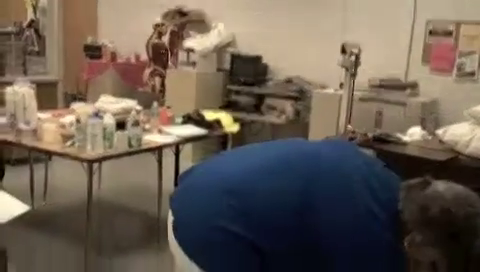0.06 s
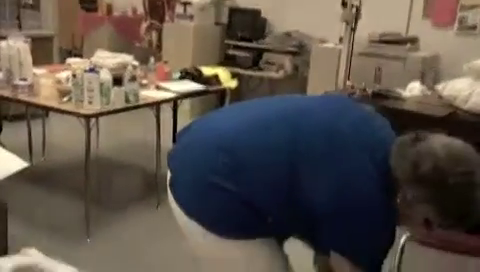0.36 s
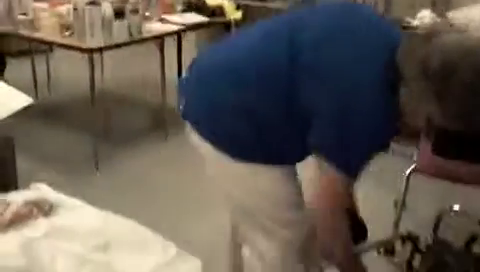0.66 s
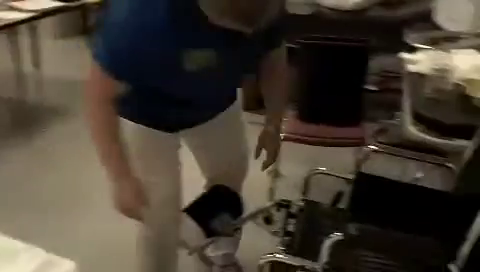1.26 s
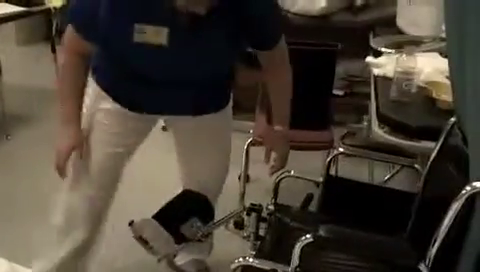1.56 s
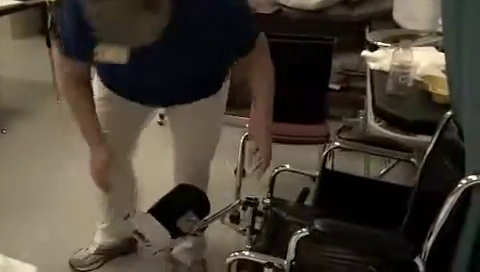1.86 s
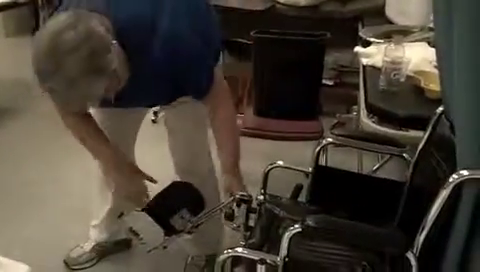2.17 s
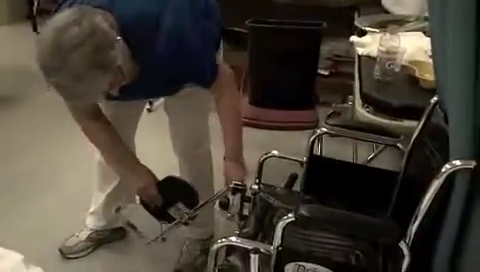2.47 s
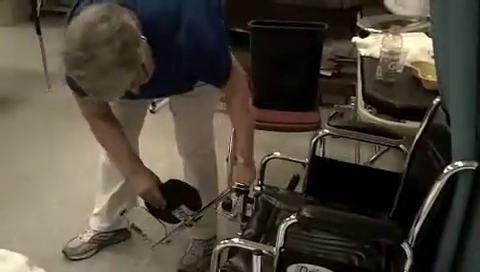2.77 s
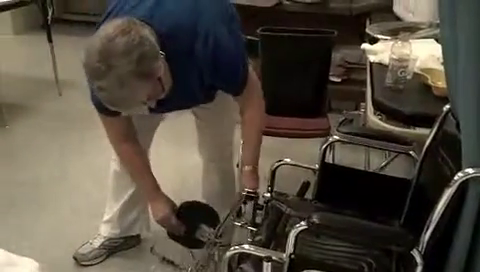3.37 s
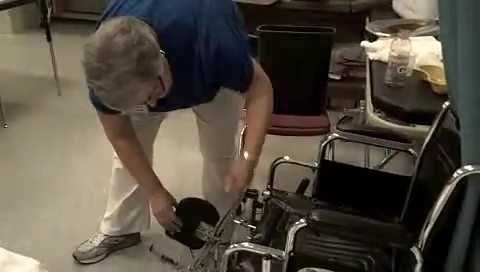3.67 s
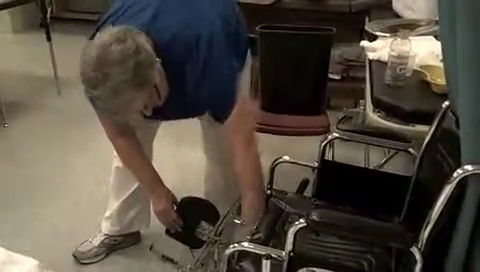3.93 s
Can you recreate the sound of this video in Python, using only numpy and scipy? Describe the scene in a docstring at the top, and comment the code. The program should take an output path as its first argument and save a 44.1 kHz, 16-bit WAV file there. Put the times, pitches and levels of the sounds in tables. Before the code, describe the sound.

Metal wheelchair parts click and clack as they are handled in a quiet room.

```python
"""Fitting a wheelchair leg rest

A metal leg rest is fitted by hand in a quiet room. Latch and tubes tick, scrape and clack:
each contact is a flurry of tiny impacts that rings the frame briefly. One joint slips with a thin squeak.
The helper's clothes rustle, shoes are set down, hands and plastic parts tap.
Ventilation rumble, mains hum and a faint buzz lie underneath."""
import sys
import numpy as np
from scipy import signal
from scipy.fft import rfft, irfft
from scipy.io import wavfile

SR = 44100
rng = np.random.default_rng(int(sys.argv[2]) if len(sys.argv) > 2 else 0)


def master_out(mix):
    """Clip the mix to full scale and print it as 16-bit PCM to the path in sys.argv[1]."""
    frames = np.transpose(np.atleast_2d(mix))
    ceiling = np.clip(frames, -1, 1)
    pcm = np.round(ceiling * 32767).astype(np.int16)
    wavfile.write(sys.argv[1], SR, pcm)


N = 176400
T = np.arange(N) / SR

# metal contacts (time [s], latch click [dB], knock [dB], snap [dB], tube ring [dB], chatter decay [s])
METAL_CONTACTS = [(.2168, -21, -40, -64, -38, 0.0047), (.243, -15.5, -24.5, -54, -33, .004),
                  (.3385, -20, -28, -58, -37, .003), (1.003, -18.5, -36, -55, -47, 0.006),
                  (1.949, -31, -39, -60, -47, .002), (2.4685, -21, -30, -55, -32, .003),
                  (2.5367, -11, -14.5, -38, -14, 0.00092), (2.539, -2, -9.5, -24.5, -9.5, 0.0025),
                  (2.575, -28, -18, -40, -17, 0.0062), (2.679, -24, -27, -55, -17, 0.017),
                  (2.7087, -11, -18.5, -32, -18, 0.0099), (2.7785, -26, -35, -52, -43, .002),
                  (2.8093, -29, -28.5, -47, -38, 0.0008), (2.8255, -9.5, -19.5, -32, -27, 0.0028),
                  (2.897, -21.5, -39, -55, -45, .003), (2.9362, -15, -18, -28, -31, 0.0023),
                  (2.939, 4.5, -9, -13.5, -24, 0.0039), (2.9505, -10, -10.5, -24, -14, 0.0014),
                  (3.089, -21, -42, -50, -42, 0.012), (3.138, -29, -19.5, -37, -30, 0.013),
                  (3.2036, -24, -21, -42, -31, 0.013), (3.2625, -27, -25, -55, -42, .009),
                  (3.356, -19, -20, -55, -40, .016), (3.377, -19, -16, -53, -35, 0.024),
                  (3.391, -20, -28, -24, -36, 0.0017), (3.393, -2.5, -20, -18.5, -10, 0.0025),
                  (3.4002, -5, -12.5, -28, -15, 0.016), (3.416, -15.5, -15, -41, -20, 0.0036),
                  (3.4295, 1, -6.5, -11.5, -9.5, 0.009), (3.5404, -19.5, -20, -33, -33, 0.0044),
                  (3.7344, -41, -31.5, -55, -29, 0.0026), (3.7668, -36, -27, -55, -32, 0.0038)]
# latch click, dull knock and treble snap spectra (frequency [Hz], relative level [dB])
CLICK_SPECTRUM = [(100, -62), (1500, -15), (2400, -8), (3200, -7.5), (3700, 1), (4300, 5.5), (5000, 6.5),
                  (5800, -2.5), (6600, -18), (7600, -31), (9200, -33), (15500, -35)]
KNOCK_SPECTRUM = [(60, -10), (160, 3), (330, 6), (600, 6.5), (900, 10), (1100, 1.5), (1350, 7), (1600, 0),
                  (1950, 5.5), (2600, -6.5), (4000, 9), (12000, -66)]
SNAP_SPECTRUM = [(2000, -17), (5400, 9), (6300, 14), (7700, -15), (9200, -1.5), (11500, 2), (13000, -4),
                 (15500, -15)]
# latch and frame tube modes (frequency [Hz], relative level [dB], T60 [s])
LATCH_MODES = [(2944, -4.5, 0.18), (3405, -11, .13), (3440, -1.5, 0.12), (3900, 0, 0.11), (4107, 2, 0.14),
               (4070, -3, 0.077), (4387, -7, 0.11), (4600, -12, .09), (4990, -4, 0.12), (5940, -23, .13),
               (6500, -12, 0.11)]
TUBE_MODES = [(540.5, -2.5, 0.086), (698, -7.5, 0.2), (888, -4.5, 0.13), (1238, -7.5, 0.12),
              (1325, -2.5, .12), (1367, 1.5, 0.11), (1889, -7.5, 0.14), (2250, -11.5, 0.11),
              (2370, -10, 0.18)]
# joint squeak (time [s], pitch [Hz], level [dB])
SQUEAK_TRACK = [(2.607, 11150, -70), (2.611, 10950, -46), (2.617, 10800, -49), (2.622, 10620, -42),
                (2.631, 10400, -44.5), (2.636, 10680, -46), (2.643, 10650, -43), (2.651, 10800, -55),
                (2.662, 10550, -69)]
# shoe contacts (time [s], thud [dB], heel click [dB], scuff decay [s])
FOOTFALLS = [(1.4357, -17, -10.5, 0.00054), (1.9969, -15.5, -15, 0.0016), (2.010, -18.5, -24, 0.0092)]
# sole thud and heel click spectra (frequency [Hz], relative level [dB])
SOLE_SPECTRUM = [(60, -14), (150, 0), (260, 3), (340, 2.5), (420, -3), (520, 2.5), (780, -1.5),
                 (1000, -18.5), (3000, -8.5), (8000, -40)]
HEEL_SPECTRUM = [(200, -21), (900, -4.5), (2100, -9.5), (3200, 3.5), (4500, 5), (5100, 0), (5900, -9),
                 (7000, -20), (8000, -39), (15000, -40)]
# taps of hands and plastic parts (time [s], level [dB], chatter decay [s])
SOFT_TAPS = [(0.665, -29, 0.0069), (1.7414, -27, .002), (2.8094, -22, 0.0009), (3.9116, -26, 0.0047)]
# tap spectrum (frequency [Hz], relative level [dB])
TAP_SPECTRUM = [(400, -11), (1200, -12.5), (1650, 2), (1950, -5), (2300, 0.5), (3000, -10.5), (5000, -3),
                (7000, -25.5), (12000, -36)]
# clothes rubbing (time [s], level [dB])
RUB_ENVELOPE = [(0, -60.5), (.6, -65.5), (.7, -56), (.9, -53.5), (1.13, -49), (1.24, -56), (1.4, -59),
                (1.52, -49.5), (1.66, -63.5), (1.98, -57.5), (2.035, -45), (2.1, -49), (2.37, -56.5),
                (2.65, -53.5), (2.88, -58.5), (3.22, -53.5), (3.6, -62.5), (4, -60)]
# fabric friction spectrum (frequency [Hz], relative level [dB])
CLOTH_SPECTRUM = [(200, 9), (1000, -10.5), (2200, -10.5), (3200, -6), (4400, 0.5), (5100, 2), (5900, -8.5),
                  (6600, -14), (7700, -34), (9800, -25), (12500, -23), (15500, -67)]
# ventilation and hiss spectrum (frequency [Hz], relative density [dB])
AIR_SPECTRUM = [(8, 6.5), (17, 15), (25, 8), (45, -1.5), (80, 1.5), (170, -6), (265, -3.5), (400, -11),
                (800, -18.5), (1120, -18.5), (1450, -25.5), (2100, -26), (3000, -34), (4000, -27.5),
                (5000, -36.5), (6000, -35), (7700, -51.5), (8600, -45.5), (15000, -40)]
# hum tones (frequency [Hz], level [dB])
HUM_TONES = [(17.5, -45.5), (119.8, -55), (262, -59.5)]
# room decay (frequency [Hz], T60 [s])
ROOM_DECAY = [(150, 0.82), (1000, 0.57), (4500, 0.27), (10000, 0.33), (15000, 0.1)]
# microphone dips (centre [Hz], half-width [Hz], depth [dB])
MIC_DIPS = [(2708, 136, 17), (5485, 270, 17), (10960, 190, 13.5)]


def metal(latch_ring_db=-10.5):
    """Each contact clicks, knocks, snaps and rings latch and tubes."""
    clicks, knocks, snaps, rings = np.zeros((4, N))
    for time_s, click_db, knock_db, snap_db, tube_db, decay_s in METAL_CONTACTS:
        add(clicks, time_s, amp(click_db) * chatter(decay_s))
        add(knocks, time_s, amp(knock_db) * chatter(decay_s))
        add(snaps, time_s, amp(snap_db) * chatter(decay_s))
        add(rings, time_s, amp(click_db + latch_ring_db) * ring(LATCH_MODES, rise_s=decay_s))
        add(rings, time_s, amp(tube_db) * ring(TUBE_MODES, rise_s=decay_s))
    return (colour(clicks, CLICK_SPECTRUM) + colour(knocks, KNOCK_SPECTRUM)
            + colour(snaps, SNAP_SPECTRUM) + rings)


def chatter(decay_s, rise_s=0.00074, hits_per_s=7000):
    """One contact: first touch, then a dying flurry of tiny impacts; energy 1."""
    t = T[:SR // 10]
    hits = rng.standard_normal(len(t)) * (rng.random(len(t)) < hits_per_s / SR)
    hits *= np.exp(-t / decay_s) * (1 - np.exp(-t / rise_s))
    hits[0] = 1.54  # first touch
    return hits / np.linalg.norm(hits)


def ring(modes, rise_s, spread_db=1.2):
    """Damped modes, excited a little differently by each blow."""
    t = T[:SR // 2]
    hz, mode_db, t60_s = np.transpose(modes)[:, :, None]
    partials = amp(mode_db) * np.exp(-np.log(1000) * t / t60_s + 2j * np.pi * hz * t)
    gains = amp(spread_db * rng.standard_normal(hz.shape))
    phasors = np.exp(2j * np.pi * rng.random(hz.shape))
    ringing = (gains * phasors * partials).real.sum(0) / np.linalg.norm(partials.real)
    return ringing * (1 - np.exp(-t / rise_s))


def squeak(jitter=0.0062):
    """A tight joint slips: one thin, unsteady tone."""
    time_s, hz, db = np.transpose(SQUEAK_TRACK)
    pitch_hz = np.interp(T, time_s, hz) * (1 + jitter * wander(400))
    envelope = amp(np.interp(T, time_s, db)) * ((T > time_s[0]) & (T < time_s[-1]))
    return envelope * np.sqrt(2) * np.sin(2 * np.pi * np.cumsum(pitch_hz) / SR)


def footsteps():
    """Heel clicks on the hard floor; sole lands with a hollow thud."""
    thuds, clicks = np.zeros((2, N))
    for time_s, thud_db, click_db, decay_s in FOOTFALLS:
        add(thuds, time_s, amp(thud_db) * chatter(decay_s))
        add(clicks, time_s, amp(click_db) * chatter(decay_s))
    return colour(thuds, SOLE_SPECTRUM) + colour(clicks, HEEL_SPECTRUM)


def taps():
    """Light, damped touches that do not ring the metal."""
    force = np.zeros(N)
    for time_s, db, decay_s in SOFT_TAPS:
        add(force, time_s, amp(db) * chatter(decay_s))
    return colour(force, TAP_SPECTRUM)


def clothes():
    """Fabric friction noise that follows the body's movement."""
    envelope = amp(np.interp(T, *np.transpose(RUB_ENVELOPE)))
    return colour(envelope * rng.standard_normal(N), CLOTH_SPECTRUM)


def ventilation(level_db=-44.5):
    """Steady air rumble and hiss."""
    gains = amp(read(AIR_SPECTRUM, np.fft.rfftfreq(N, 1 / SR)))
    return amp(level_db) * unit(irfft(rfft(rng.standard_normal(N)) * gains, N))


def hum(waver=0.25):
    """Mains hum and two other low tones, wavering in level and phase."""
    tones = np.zeros(N)
    for hz, db in HUM_TONES:
        drift = 1 + waver * (wander(7.3) + 1j * wander(8.9))
        tones += amp(db) * unit((drift * np.exp(2j * np.pi * hz * T)).real)
    return tones


def buzz(level_db=-81, mains_hz=60, tone_hz=8150, width_s=0.000067):
    """Faint electric buzz: one treble pip per mains cycle."""
    offset_s = (T * mains_hz % 1 - .5) / mains_hz
    pips = np.exp(-(offset_s / width_s) ** 2) * np.sin(2 * np.pi * tone_hz * offset_s)
    return amp(level_db) * unit(pips)


def room(x, tail_db, early_db=-7, early_decay_s=0.014, echoes_per_s=4000):
    """Direct sound, early reflections off floor and furniture, short diffuse tail."""
    t = T[:SR]
    hz, frame_s, spectra = signal.stft(rng.standard_normal(SR), SR, nperseg=256)
    spectra *= np.exp(-np.log(1000) * frame_s / read(ROOM_DECAY, hz)[:, None])
    tail = signal.istft(spectra, SR, nperseg=256)[1][:SR]
    tail *= 1 - np.exp(-(t / 0.0095) ** 2)
    early = rng.choice([-1., 1.], SR) * (rng.random(SR) < echoes_per_s / SR)
    early *= np.exp(-t / early_decay_s) * (1 - np.exp(-(t / 0.0034) ** 2))
    response = amp(tail_db) * tail / np.linalg.norm(tail) + amp(early_db) * early / np.linalg.norm(early)
    return x + signal.fftconvolve(x, response)[:N]


def amp(db):
    """Decibels to gain."""
    return 10 ** (np.asarray(db) / 20)


def unit(x):
    """Scale to rms 1."""
    return x / np.sqrt(np.mean(x ** 2) + 1e-20)


def read(table, hz):
    """Interpolate on a log-frequency axis."""
    table_hz, values = np.transpose(table)
    return np.interp(np.log(hz + 1), np.log(table_hz + 1), values)


def add(mix, time_s, sound):
    """Mix a sound in at time_s."""
    part = mix[round(time_s * SR):][:len(sound)]
    part += sound[:len(part)]


def wander(rate_hz):
    """Smooth random drift, rms 1."""
    hz = np.fft.rfftfreq(N, 1 / SR)
    return unit(irfft(rfft(rng.standard_normal(N)) * np.exp(-(hz / rate_hz) ** 2), N))


def minimum_phase(curve_db, size=4096):
    """Causal impulse response of a dB curve over frequency."""
    log_gain = np.log(amp(curve_db(abs(np.fft.fftfreq(size, 1 / SR)))))
    return np.fft.ifft(np.exp(np.conj(signal.hilbert(log_gain)))).real[:size // 2]


def colour(x, spectrum):
    """Filter by a spectrum, keeping a click's energy."""
    response = minimum_phase(lambda hz: read(spectrum, hz))
    return signal.oaconvolve(x, response / np.linalg.norm(response))[:N]


def scene():
    """Impacts and squeak with room reflections, plus clothes and background; mono."""
    impacts = room(metal() + footsteps() + taps(), tail_db=-11)
    joint = room(squeak(), tail_db=-15)
    return (impacts + joint + clothes() + ventilation() + hum() + buzz())[None]


def record(dry, cutoff_hz=15400):
    """Narrow microphone dips, then the band limit."""
    dips = minimum_phase(lambda hz: -sum(depth_db / (1 + ((hz - centre_hz) / half_width_hz) ** 2)
                                         for centre_hz, half_width_hz, depth_db in MIC_DIPS))
    notched = signal.oaconvolve(dry, dips[None])[:, :N]
    lowpass = signal.firwin(511, cutoff_hz, window=("kaiser", 9), fs=SR)
    return signal.oaconvolve(notched, lowpass[None], "same")


dry = scene()
out = record(dry)
master_out(out)
```